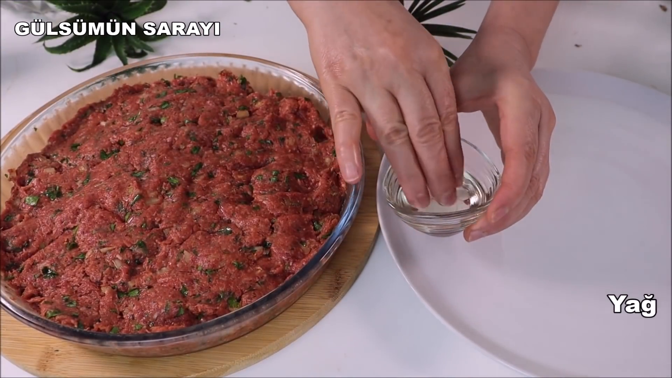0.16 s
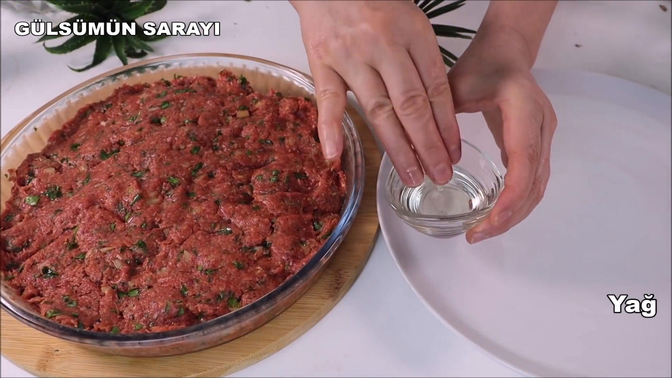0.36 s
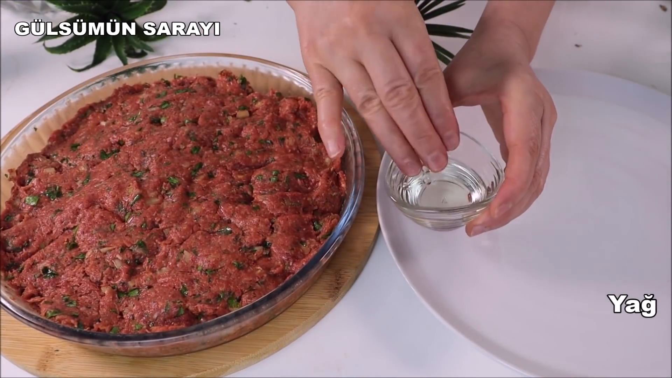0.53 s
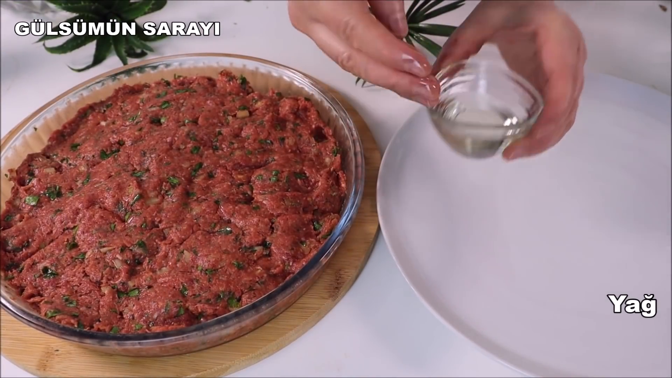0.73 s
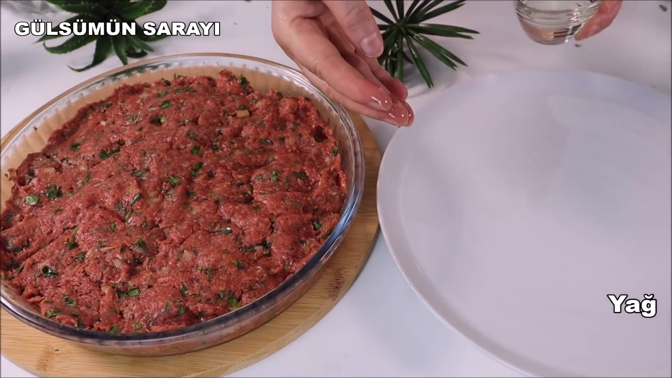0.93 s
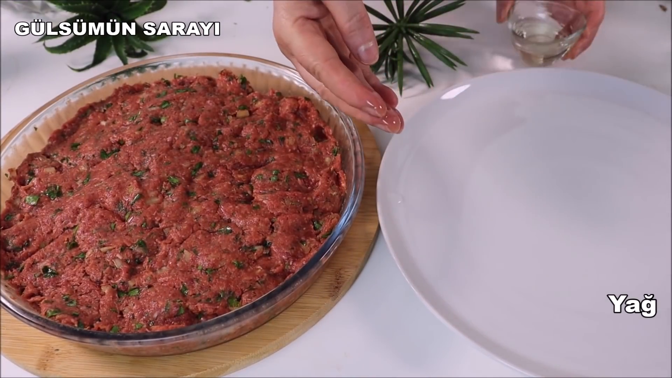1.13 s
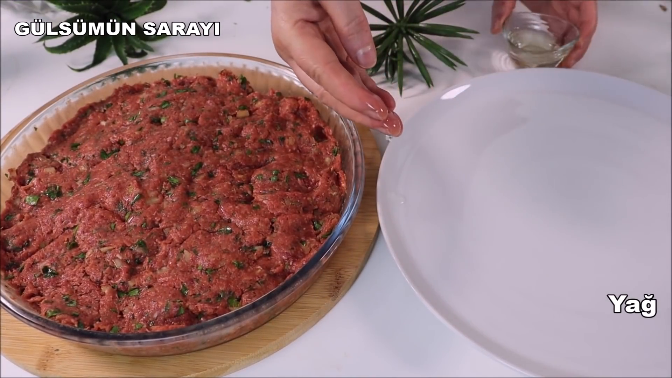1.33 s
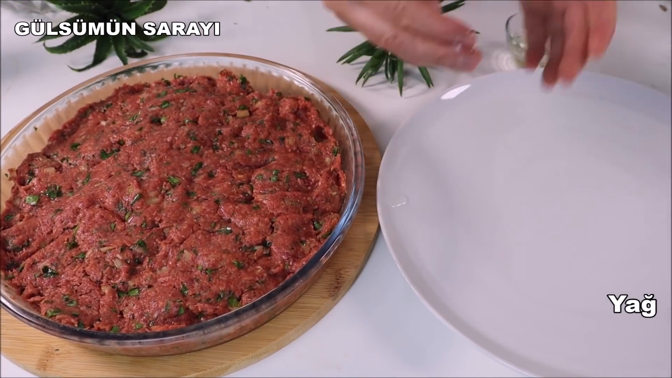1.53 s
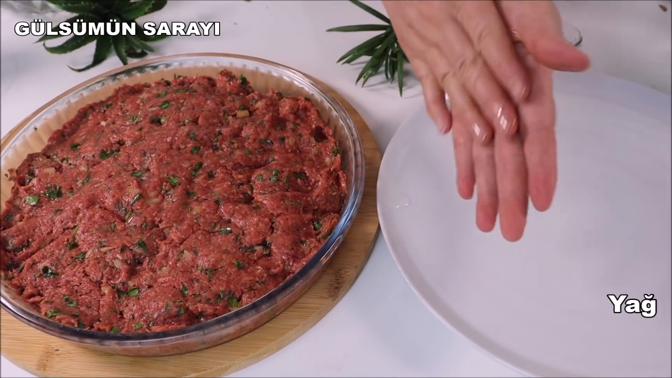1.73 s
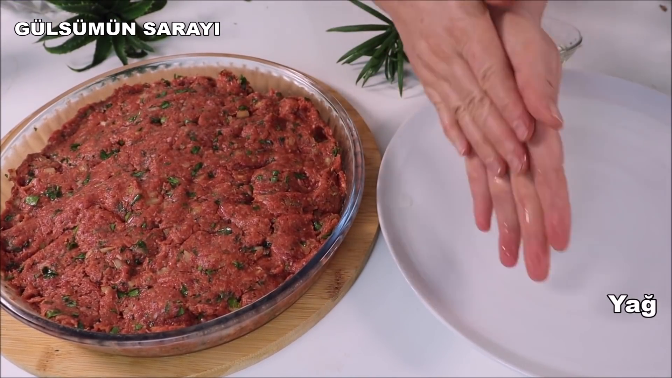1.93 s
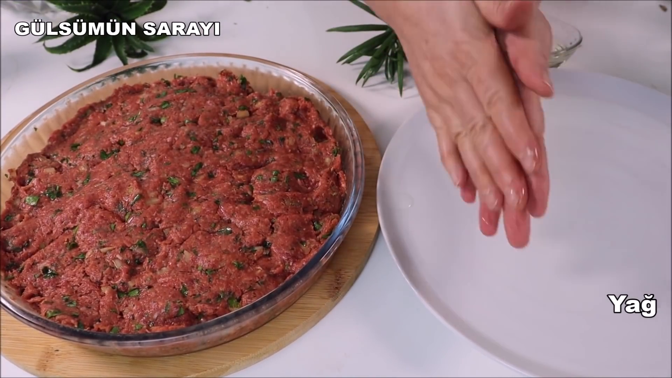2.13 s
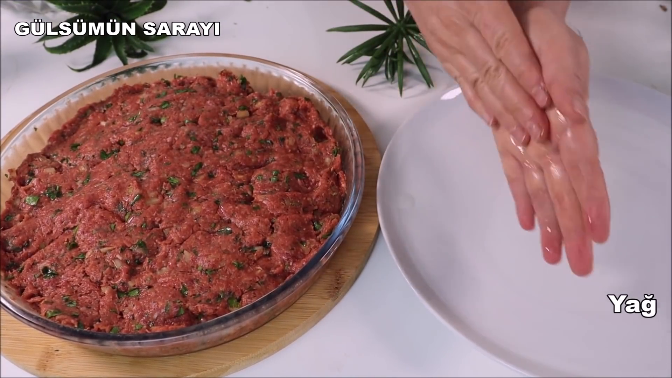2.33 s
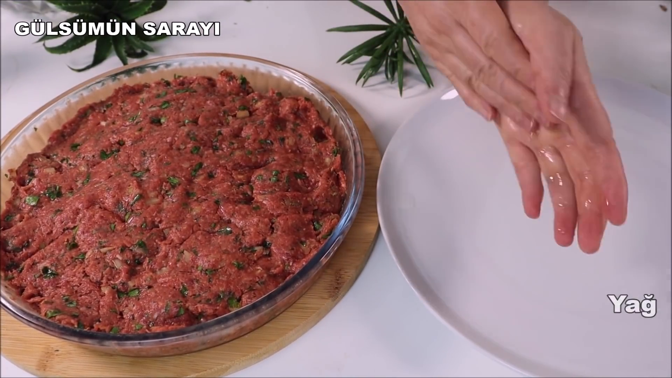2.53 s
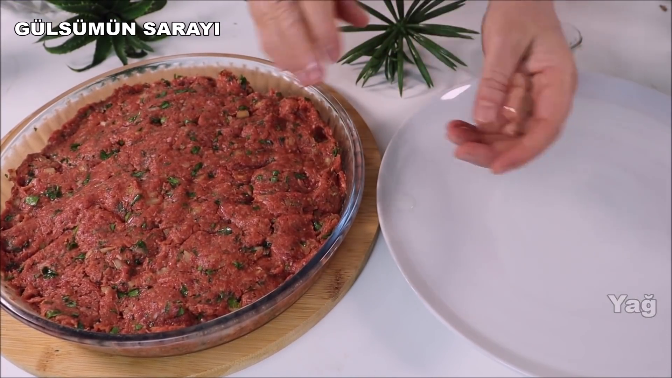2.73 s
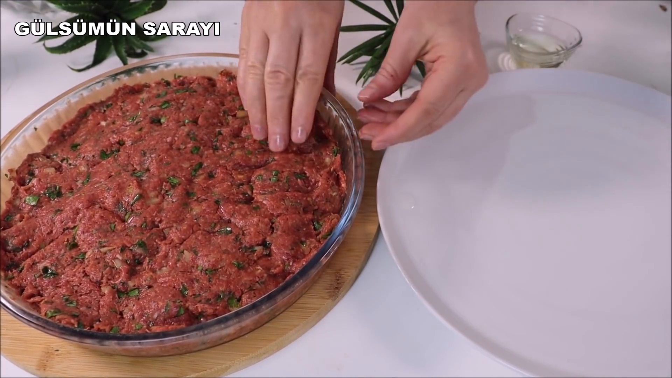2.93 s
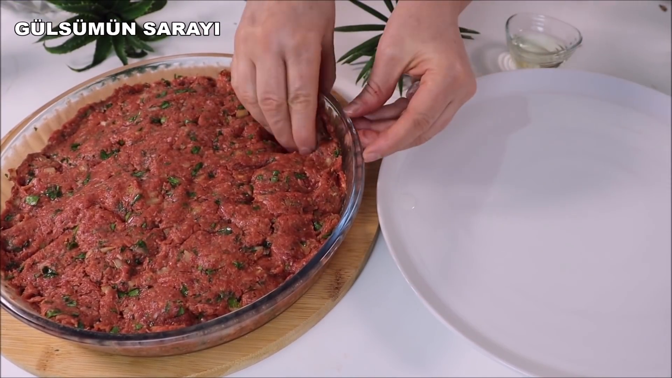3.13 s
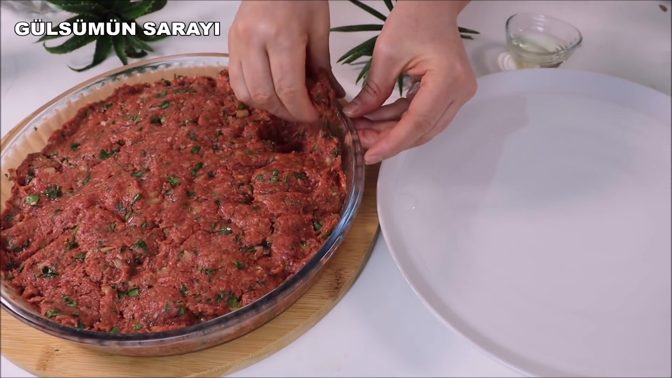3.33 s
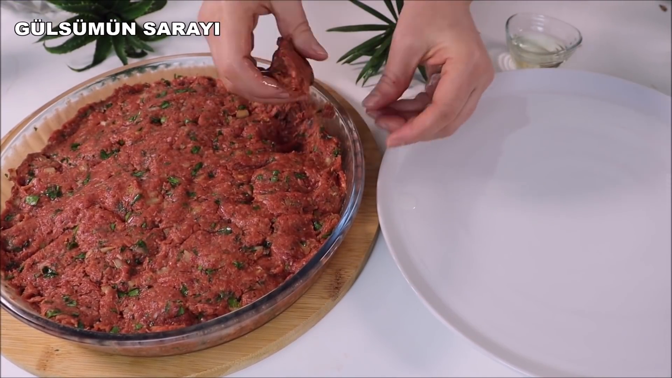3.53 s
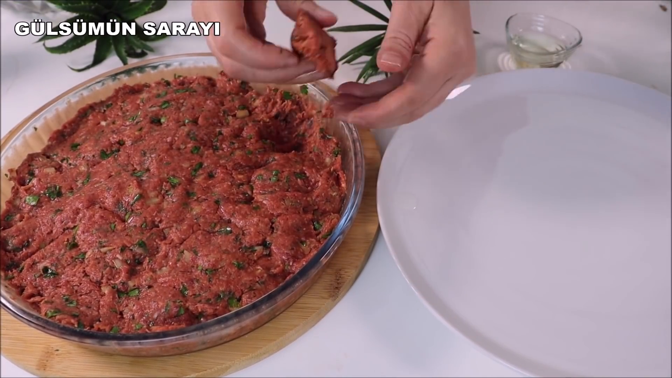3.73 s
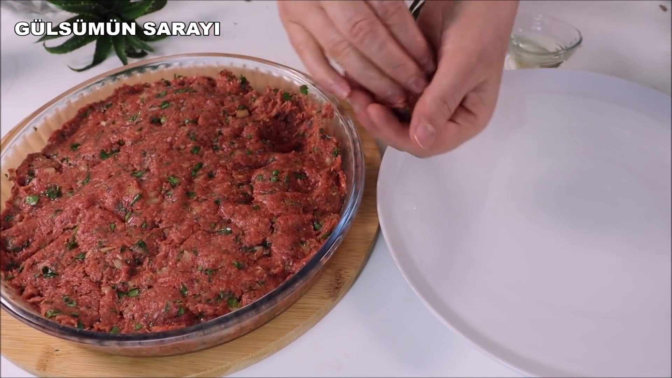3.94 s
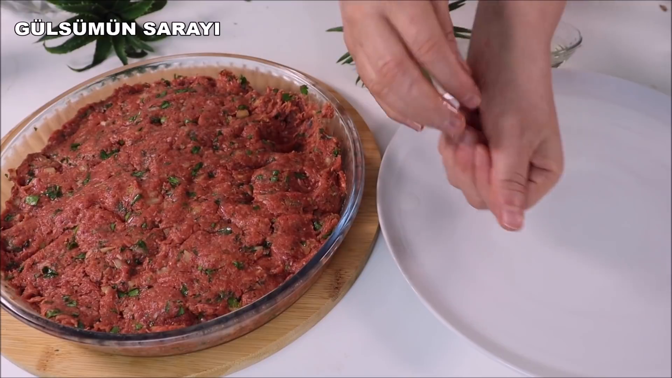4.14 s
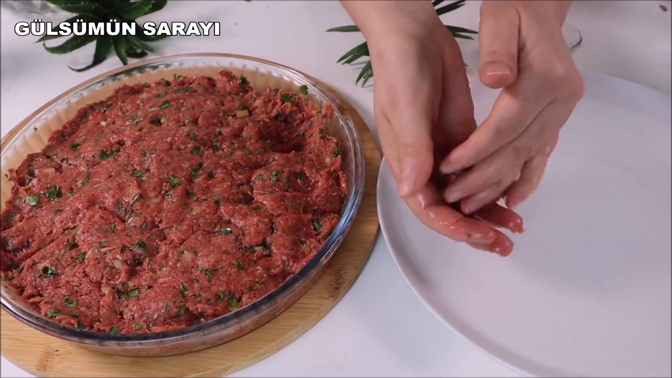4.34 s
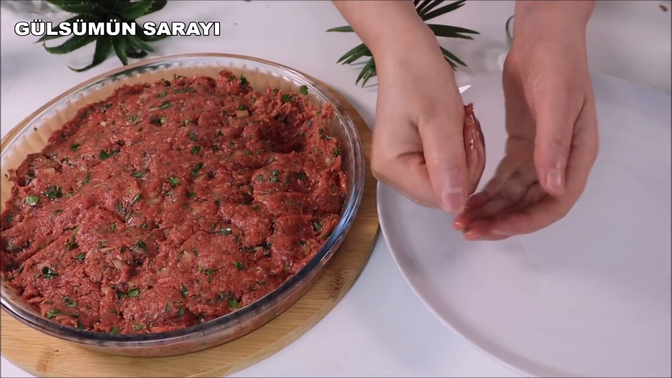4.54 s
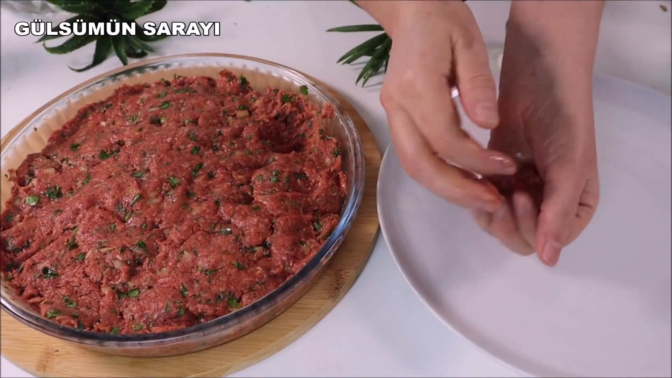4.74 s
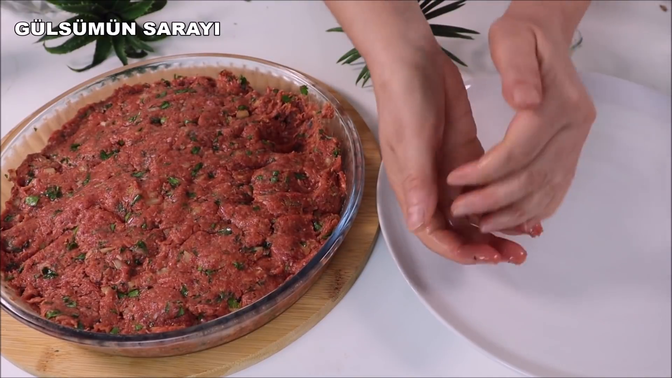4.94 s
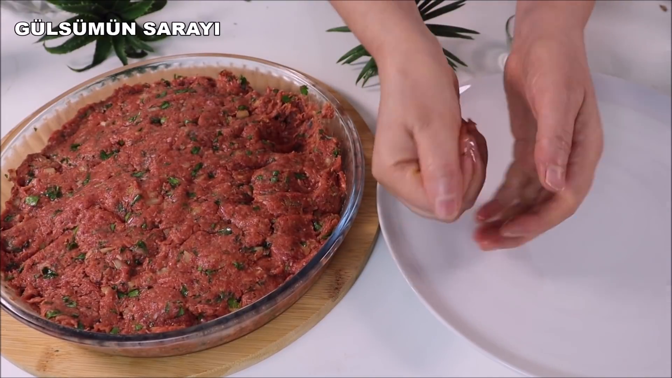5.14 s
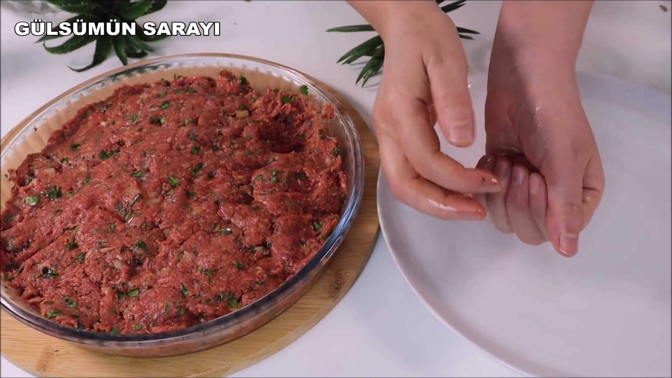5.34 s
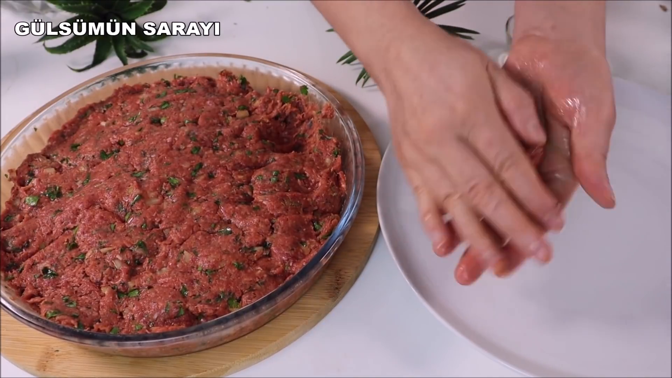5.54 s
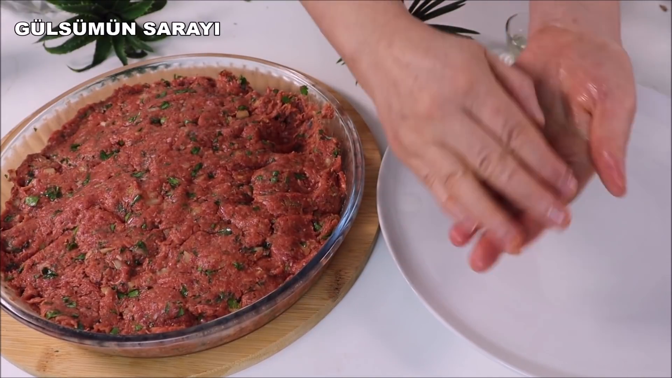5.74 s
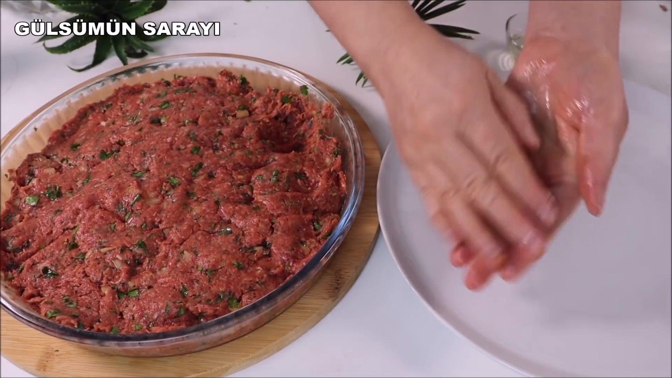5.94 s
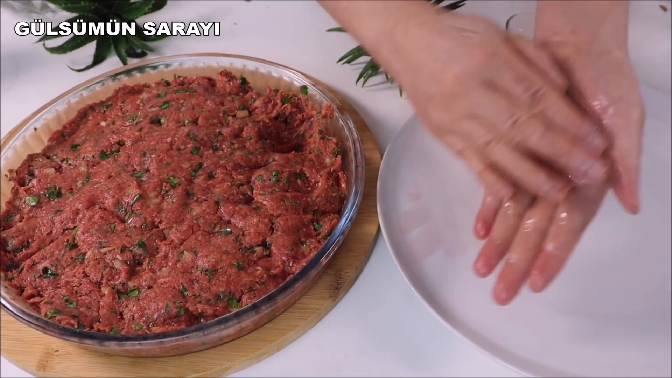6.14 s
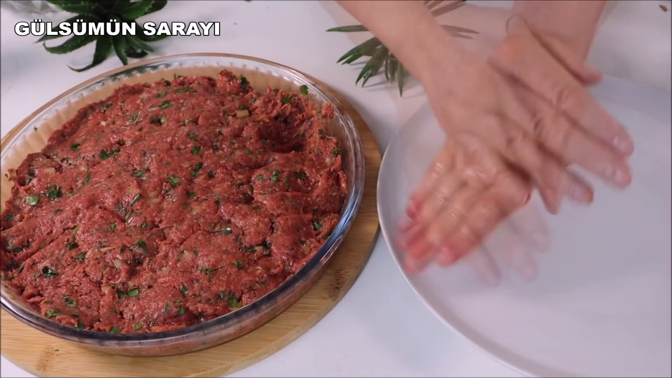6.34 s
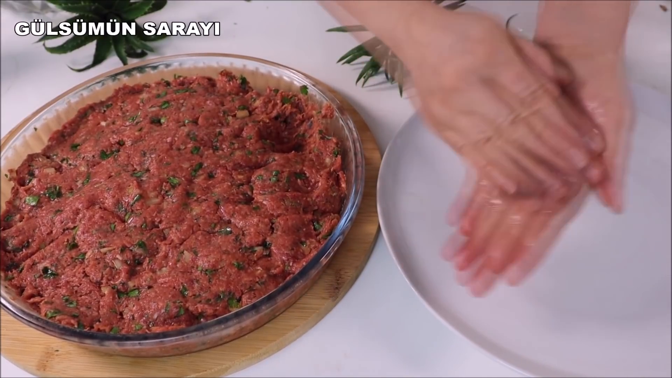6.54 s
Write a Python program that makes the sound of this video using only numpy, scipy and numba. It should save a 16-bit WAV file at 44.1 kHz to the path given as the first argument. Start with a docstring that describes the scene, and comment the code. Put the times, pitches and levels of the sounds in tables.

```python
"""Hands rub softly, then a small glass bowl meets a kitchen counter: a light touch, a knock with bounces.
The rubbing grows, fingers touch a glass dish and pinch sticky mince, and cupped palms roll it at the end.
A fan hum, a wavering hum, deep rumble and room noise last throughout; reflections add a small hard room.
Solids sound as clicks exciting damped modes, skin as friction noise with sticky ticks,
and the air between the palms as a gliding resonance."""
import sys
import numpy as np
from scipy import signal
from scipy.fft import rfft, irfft, next_fast_len
from scipy.io import wavfile
from scipy.ndimage import uniform_filter1d
from numba import njit

SR = 44100
rng = np.random.default_rng(int(sys.argv[2]) if len(sys.argv) > 2 else 0)


def digitize_waveform(pressure):
    """Quantize a signal to 16-bit integers and store it at the path in sys.argv[1].

    Rows of a 2-D input are taken as channels; values are limited to [-1, 1].
    """
    field = np.atleast_2d(pressure).T
    bounded = np.clip(field, -1, 1)
    quanta = np.round(bounded * 32767).astype(np.int16)
    wavfile.write(sys.argv[1], SR, quanta)


N = 290178


def amp(db):
    """Level: amplitude ratio from decibels."""
    return 10 ** (np.asarray(db) / 20)


def rms_one(x):
    """Normalisation: scale to an rms of 1."""
    return x / np.sqrt(np.mean(x ** 2) + 1e-20)


def in_time(rows):
    """Linear interpolation: each column of a curve table, one value per sample."""
    seconds, *columns = np.transpose(rows)
    return [np.interp(np.arange(N) / SR, seconds, column) for column in columns]


def at_hz(points, hz):
    """Interpolation of a table along a logarithmic frequency axis."""
    table_hz, values = np.array(points).T
    return np.interp(np.log(hz + 1), np.log(table_hz), values)


def drift(rate_hz):
    """Low-pass random process: slow wandering with rms 1, computed at every 40th sample."""
    step = 40
    r = np.exp(-2 * np.pi * rate_hz * step / SR)
    white = rng.standard_normal(N // step + 2002)
    slow = signal.lfilter([1], [1, -2 * r, r * r], white)[2000:]  # drop the settling
    return np.interp(np.arange(N) / step, np.arange(len(slow)), rms_one(slow))


def ring(clicks, hz, t60):
    """Damped mode: a unit click starts a decaying sine of height 1."""
    r = amp(-60 / (t60 * SR))
    w = 2 * np.pi * hz / SR
    return signal.lfilter([0, np.sin(w)], [1, -2 * r * np.cos(w), r * r], clicks + 1e-18)


def ring_modes(clicks, modes):
    """Modal superposition: damped modes summed with alternating sign."""
    return sum(amp(db) * ring(clicks, hz, t60) * (-1) ** k for k, (hz, db, t60) in enumerate(modes))


def colour(x, spectrum):
    """Spectral shaping: weight each frequency by a table, then scale to rms 1."""
    size = next_fast_len(N)
    gain = amp(at_hz(spectrum, np.fft.rfftfreq(size, 1 / SR)))
    return rms_one(irfft(rfft(x, size) * gain, size)[..., :N])


def stereo_noise(size, likeness):
    """Partial coherence: mixing mid and side noise sets the left-right likeness by frequency."""
    mid, side = rfft(rng.standard_normal((2, size)))
    alike = np.clip(at_hz(likeness, np.fft.rfftfreq(size, 1 / SR)), -1, 1)
    common = np.sqrt((1 + alike) / 2) * mid
    opposed = np.sqrt((1 - alike) / 2) * side * [[1], [-1]]
    return irfft(common + opposed, size)


@njit
def moving_resonance(x, hz, width_hz, sr):
    """Resonance: a two-pole filter whose centre frequency glides."""
    out = np.zeros(len(x))
    r = np.exp(-np.pi * width_hz / sr)
    for i in range(2, len(x)):
        feedback = 2 * r * np.cos(2 * np.pi * hz[i] / sr) * out[i - 1] - r * r * out[i - 2]
        out[i] = x[i] - x[i - 2] + feedback
    return out


def sharp_pulse(spectrum, size=4096):
    """Minimum phase: the most compact causal pulse with this spectrum, scaled to peak 1."""
    log_gain = np.log(amp(at_hz(spectrum, np.fft.rfftfreq(size, 1 / SR))))
    cepstrum = irfft(log_gain, size)
    # folding the cepstrum forward in time makes the pulse causal
    cepstrum[1:size // 2] *= 2
    cepstrum[size // 2 + 1:] = 0
    pulse = irfft(np.exp(rfft(cepstrum)), size)
    return pulse / np.abs(pulse).max()


FAN_HZ = 74.1
# Fan harmonics. Each row: multiple of FAN_HZ, typical rms level in dB.
FAN_HARMONICS = [(1, -62.5), (2, -68.5), (3, -69.5), (4, -89), (6, -89), (7, -71.5), (8, -72.5), (16, -88)]


def fan():
    """Harmonic series: sines at multiples of one unsteady frequency, each wavering in level."""
    turn = 2 * np.pi * np.cumsum(FAN_HZ * (1 + 0.001765 * drift(1.0))) / SR
    total = np.zeros(N)
    for k, db in FAN_HARMONICS:
        level = amp(db + 1.17 * min(k, 3) * drift(5.7))
        total += level * np.sqrt(2) * np.sin(k * turn + rng.uniform(0, 2 * np.pi))
    return total


# Course of a wavering hum. Each row: time in seconds, level in dB, centre in Hz.
HUM_COURSE = [(0, -61.5, 222), (.3, -72, 223), (1.0, -66.5, 216), (1.35, -62, 211), (1.75, -54.5, 212),
              (2.0, -52.5, 203), (2.25, -58, 212), (2.45, -67.5, 215), (3.05, -63, 220), (3.3, -56.5, 231),
              (3.45, -64, 217), (4.4, -64, 215), (5.2, -69, 215), (5.37, -57, 204), (5.6, -66, 212),
              (5.9, -68.5, 216), (6.17, -51.5, 228.4), (6.58, -61, 210)]
HUM_WIDTH_HZ = 14.0


def hum():
    """Narrow-band noise: a sharp resonance of wandering pitch, driven by white noise."""
    level_db, hz = in_time(HUM_COURSE)
    return amp(level_db) * rms_one(moving_resonance(rng.standard_normal(N), hz, HUM_WIDTH_HZ, SR))


# Course of the deep rumble. Each row: time in seconds, level in dB.
RUMBLE_LEVEL = [(0, -72), (.3, -64), (1.3, -74), (1.67, -53.5), (1.9, -59), (2.4, -82), (4.1, -75),
                (4.84, -61.5), (5.25, -72), (5.7, -79), (5.95, -58), (6.2, -54.5), (6.58, -62)]


def rumble():
    """Band-limited noise: random low-frequency pressure with a drifting level."""
    band = signal.butter(1, [38, 75], "band", fs=SR, output="sos")
    deep = signal.sosfilt(band, rng.standard_normal(N))
    return amp(in_time(RUMBLE_LEVEL)[0]) * rms_one(deep)


# Spectrum of room and microphone noise. Each row: frequency in Hz, relative density in dB per Hz.
AIR_SPECTRUM = [(20, -13), (45, -7.5), (100, -13.5), (200, -12), (330, -7), (450, -11.5), (700, -14),
                (1700, -17.5), (3200, -21.5), (6000, -23.5), (16000, -26)]
# Course of that noise. Each row: time in seconds, level in dB before the common AIR_GAIN_DB.
AIR_COURSE = [(0, -58.5), (1.0, -59), (1.2, -57), (1.8, -58), (2.9, -58), (3.4, -57), (4.0, -58),
              (5.15, -59), (5.5, -56.5), (5.95, -58), (6.2, -54.5), (6.58, -54)]
# Its stereo coherence. Each row: frequency in Hz, left-right likeness from -1 to 1.
AIR_COHERENCE = [(60, 0.85), (150, 0.36), (380, 0.74), (950, 0.25), (2380, 0.24), (5980, -0.32),
                 (15000, -0.31)]
AIR_GAIN_DB = 3.5


def room_noise():
    """Diffuse noise: broadband, partly coherent between left and right, slowly changing in level."""
    air = colour(stereo_noise(N, AIR_COHERENCE), AIR_SPECTRUM)
    return air * amp(in_time(AIR_COURSE)[0] + AIR_GAIN_DB)


def background():
    """Superposition of the independent background sources."""
    return fan() + hum() + rumble() + room_noise()


# Reverberation by band. Each row: frequency in Hz, decay time t60 in seconds.
ROOM_DECAY = [(150, 0.43), (500, 0.25), (1500, 0.36), (3000, 0.26), (8000, 0.39)]
# Stereo coherence of the reflections. Each row: frequency in Hz, left-right likeness.
ROOM_COHERENCE = [(100, 1), (700, 0.99), (1500, 0.94), (3000, 0.76), (7000, 0.32), (15000, .1)]


def room(x, build_s=0.0016, early_db=5.5, early_s=0.015):
    """Reverberation: dense reflections die band by band, with an early boost from the nearest surfaces."""
    size = SR // 2
    t = np.arange(size) / SR
    noise = stereo_noise(size, ROOM_COHERENCE)
    lowpassed = [np.zeros_like(noise)]
    for hz in 125 * 2. ** np.arange(8):
        lowpassed.append(signal.sosfiltfilt(signal.butter(2, hz, fs=SR, output="sos"), noise))
    tail = 0
    for k in range(8):
        band = lowpassed[k + 1] - lowpassed[k]
        tail = tail + band * amp(-60 * t / at_hz(ROOM_DECAY, 88 * 2. ** k))
    tail = tail * (1 - np.exp(-t / build_s)) * amp(early_db * np.exp(-t / early_s))
    tail = tail / np.sqrt(np.sum(tail ** 2) / 2)  # unit mean energy per channel
    return signal.fftconvolve(x[None], tail, axes=1)[:, :N]


# Strokes of skin on skin. Each row: peak in seconds, peak level in dB, rise in seconds, fall in seconds,
# treble share in dB. Rise and fall each span SWELL_DB.
STROKES_OF_SKIN = [(1.111, -50.5, 0.14, 0.27, -2), (1.34, -50, 0.013, 0.022, -5),
                   (1.83, -48.5, 0.023, 0.12, 3), (1.902, -40.5, 0.067, 0.047, -1.5),
                   (2.02, -43, 0.08, 0.11, -1), (2.114, -52.5, 0.12, 0.021, -0.5),
                   (2.228, -48, 0.059, 0.08, 0), (2.268, -46, 0.11, 0.029, -2.5),
                   (2.352, -40.5, 0.04, 0.071, -1.5), (2.512, -43.5, 0.043, 0.041, -0.5),
                   (2.586, -44.5, 0.037, 0.09, -1), (2.67, -59.5, .05, 0.098, -1.5),
                   (3.132, -54, .017, 0.04, -10), (3.276, -52.5, 0.14, .2, -1),
                   (3.34, -49, .08, 0.19, -0.5), (3.446, -52.5, 0.22, 0.074, -1),
                   (3.526, -53.5, 0.12, 0.027, 1), (3.626, -59, .02, .1, -0.5),
                   (3.904, -63.5, .016, .3, -1), (4.128, -53, 0.021, 0.025, -0.5),
                   (4.21, -58, .1, .08, -0.5), (4.272, -61, .1, 0.064, -11), (4.348, -48, 0.02, 0.085, 1),
                   (4.392, -49.5, 0.079, 0.037, -1.5), (4.634, -57.5, 0.17, 0.042, -8),
                   (4.706, -42.5, 0.024, 0.058, -0.5), (4.94, -59.5, 0.17, 0.041, -9),
                   (5.016, -48.5, 0.05, 0.04, -1.5), (5.224, -55, 0.078, .036, -11),
                   (5.267, -47, 0.016, 0.063, -2), (5.462, -62, 0.071, 0.21, -3.5),
                   (5.554, -49, 0.035, 0.035, -1.5), (5.674, -49.5, .012, 0.11, 3),
                   (6.3, -51, 0.011, 0.035, -3)]
# Unbroken light contact, swelling when the mince is rolled. Each row: time in seconds, hiss level in dB.
LIGHT_CONTACT = [(0, -70), (1.4, -67), (3.0, -73), (4.0, -71.5), (5.55, -71), (5.75, -57), (5.93, -58.5),
                 (6.05, -55), (6.12, -54.5), (6.5, -54), (6.58, -61)]
SWELL_DB, CONTACT_TREBLE_DB = 20, -1


def touch():
    """Energy addition: strokes, even in dB, join the light contact; returns hiss level and treble share in dB."""
    t = np.arange(N) / SR
    power = amp(in_time(LIGHT_CONTACT)[0]) ** 2
    treble = power * CONTACT_TREBLE_DB  # treble share weighted by power
    for s, peak_db, rise, fall, treble_db in STROKES_OF_SKIN:
        near = slice(max(round((s - 2 * rise) * SR), 0), round((s + 2 * fall) * SR))
        away = np.where(t[near] < s, (s - t[near]) / rise, (t[near] - s) / fall)
        stroke = amp(peak_db - SWELL_DB * away) ** 2
        power[near] += stroke
        treble[near] += stroke * treble_db
    return 10 * np.log10(power), treble / power


# Spectrum of skin friction before its bands are rebalanced. Each row: frequency in Hz, density in dB per Hz.
SKIN_SPECTRUM = [(900, -21), (2000, 0.5), (4000, -2.5), (7000, -2.5), (10000, -0.5), (16000, -0.5)]
# Stereo coherence of the friction hiss. Each row: frequency in Hz, left-right likeness.
SKIN_COHERENCE = [(1500, 0.71), (4000, 0.48), (9000, 0.45), (15000, 0.41)]
# How much the skin clings. Each row: time in seconds, mean ticks per second.
STICKINESS = [(0, 100), (3.0, 19), (3.2, 320), (3.7, 420), (4.0, 230), (5.6, 200), (5.8, 260), (6.58, 126)]
# dull share at a middling touch; it shrinks by DULL_LOSS of each dB above
DULL_DB, DULL_AT_DB, DULL_LOSS = -9.5, -55, 0.65


def skin():
    """Stick-slip friction: fluctuating hiss with random ticks; its treble and dull parts follow the touch."""
    hiss_db, treble_db = touch()
    dull_db = DULL_DB - DULL_LOSS * np.maximum(hiss_db - DULL_AT_DB, -8.0)
    per_s, = in_time(STICKINESS)
    happens = rng.random(N) < np.maximum(per_s, 0) / SR
    ticks = happens * amp(3.85 * np.minimum(rng.exponential(1, N), 4))
    hiss = stereo_noise(N, SKIN_COHERENCE) * amp(1.66 * drift(60))
    friction = colour(hiss + 3.0 * ticks * rng.choice([-1, 1], N), SKIN_SPECTRUM)
    dull, below_treble = [signal.sosfiltfilt(signal.butter(2, hz, fs=SR, output="sos"), friction)
                          for hz in (4800, 10000)]
    middle, treble = below_treble - dull, friction - below_treble
    share = np.clip(amp(treble_db), 0, .97)
    # treble and middle trade off by power; the dull part is added
    parts = share * rms_one(treble) + np.sqrt(1 - share ** 2) * rms_one(middle) + amp(dull_db) * rms_one(dull)
    return amp(hiss_db) * parts


# Air hollow between palms or fingers, gliding as it opens or closes. Each row: start in seconds,
# end in seconds, start in Hz, end in Hz, rms level in dB before the swell and fade.
AIR_HOLLOWS = [(1.822, 1.845, 4800, 3650, -56.5), (1.829, 1.878, 3380, 2400, -52.5),
               (1.879, 1.958, 2380, 2020, -60), (2.06, 2.1, 2700, 4600, -59),
               (2.186, 2.228, 4700, 2360, -56.5), (2.228, 2.292, 2500, 1570, -64),
               (2.336, 2.407, 1780, 3070, -56.5), (2.348, 2.392, 5430, 5600, -51.5),
               (2.5, 2.522, 2300, 2100, -58.5), (3.33, 3.404, 3680, 3420, -54.5),
               (3.398, 3.48, 3130, 3160, -55.5), (4.241, 4.3, 5260, 6440, -56.5),
               (4.69, 4.748, 5440, 4800, -55), (4.919, 4.945, 4400, 4400, -61),
               (5.256, 5.29, 2900, 2680, -57.5), (5.44, 5.483, 6000, 5600, -61),
               (5.67, 5.73, 2850, 4500, -58.5), (5.80, 5.84, 3800, 5000, -60),
               (6.183, 6.243, 2200, 2200, -59), (6.501, 6.543, 5000, 5200, -61),
               (5.715, 5.788, 3000, 2560, -60), (5.777, 5.852, 2800, 3380, -58),
               (5.853, 5.886, 4300, 3530, -59), (5.938, 6.002, 2680, 2250, -57),
               (5.963, 6.018, 4170, 5200, -58), (6.089, 6.17, 3000, 2300, -55),
               (6.145, 6.19, 2410, 3860, -54.5), (6.285, 6.332, 2420, 2520, -52.5),
               (6.317, 6.355, 4180, 4300, -54.5), (6.409, 6.55, 3160, 2600, -53)]
HOLLOW_WIDTH_HZ = 300.0


def hollows():
    """Cavity resonance: friction noise excites the trapped air, gliding in pitch as it swells and fades."""
    out = np.zeros(N)
    for start, end, start_hz, end_hz, db in AIR_HOLLOWS:
        at, size = round(start * SR), round((end - start) * SR)
        glide = np.geomspace(start_hz, end_hz, size)
        slips, unevenness = rng.standard_normal((2, SR // 4))[:, :size]
        # wet skin slips unevenly: the drive comes in lumps
        drive = slips * amp(25 * uniform_filter1d(unevenness, size=100))
        air = moving_resonance(drive, glide, HOLLOW_WIDTH_HZ, SR)
        out[at:at + size] += amp(db) * rms_one(air) * np.sin(np.linspace(0, np.pi, size))
    return out


# Sticky mince and wet skin letting go. Each row: time in seconds, starting height in dB, pitch in Hz.
RELEASES = [(2.672, -39, 9340), (3.1976, -41, 13000), (3.257, -42, 10100), (3.2704, -37, 13600),
            (3.299, -37, 4780), (3.3104, -41, 12800), (3.3433, -31, 13800), (3.3608, -39, 3350),
            (3.3764, -42, 3660), (3.426, -37, 3260), (3.6278, -33, 10000), (3.636, -38, 9850),
            (3.6603, -36, 12200), (4.174, -42, 11500), (4.2308, -32, 12700), (4.3321, -40, 13400),
            (4.3942, -32.5, 7240), (4.569, -47, 8150), (4.6954, -37, 13600), (4.7032, -36, 6800),
            (4.7144, -35, 5370), (4.9276, -37, 5970), (4.9886, -37, 13700), (5.011, -27, 13700),
            (5.0144, -37, 13600), (5.155, -40, 14800), (5.218, -35, 6660), (5.254, -32.5, 6850),
            (5.2639, -30, 14000), (5.4545, -40, 6240), (5.495, -42, 10500), (5.5398, -39, 11800),
            (5.6742, -38.5, 3420), (6.2552, -32, 13500), (6.2994, -34, 2750)]
SMACK_T60_S = 0.0028


def smacks():
    """Impulse response: each sudden release is one click ringing for a few ms at its own pitch."""
    out = np.zeros(N)
    for s, peak_db, hz in RELEASES:
        at = round(s * SR)
        pop = amp(peak_db) * ring(signal.unit_impulse(2000), hz, SMACK_T60_S)
        out[at:][:2000] += pop[:N - at]
    return out


# Fingertips touch the glass dish. Each row: time in seconds, click height in dB.
DISH_TOUCHES = [(3.1265, -43.5), (3.1325, -45), (3.1435, -45), (3.158, -50)]
# Modes of the dish. Each row: frequency in Hz, level in dB relative to the click, t60 in seconds.
DISH_MODES = [(697, -8, 0.052), (2057, 1.5, 0.034), (3100, 3.5, 0.0072), (3900, 0, .005), (9600, -14, .004)]


def dish():
    """Modal response: light taps ring the dish's few damped modes."""
    clicks = np.zeros(N)
    for s, peak_db in DISH_TOUCHES:
        clicks[round(s * SR)] = amp(peak_db)
    return sum(amp(db) * ring(clicks, hz, t60) for hz, db, t60 in DISH_MODES)


# Bowl meets counter. Each row: time in seconds, click level in dB before softening,
# contact low-pass in Hz, extra drive of the ringing in dB.
CONTACTS = [(1.3732, -14.5, 3400, 0.5), (1.4797, -12, 4000, -26), (1.4827, -2.5, 8050, -1),
            (1.4868, -9.5, 1200, 4.5), (1.4899, -21, 8000, -8), (1.4932, -3, 5030, 0.5),
            (1.4982, -15.5, 5000, 6.5), (1.5047, -15.5, 5000, -11), (1.507, -10, 2000, 0),
            (1.5173, -9, 3980, -0.5)]
# Near sound of a contact. Each row: frequency in Hz, level in dB relative to the click, t60 in seconds.
NEAR_MODES = [(1020, -3, 0.0049), (2390, 2, 0.0043), (2950, -8.5, 0.01), (3705, -11.5, 0.022),
              (8620, -27.5, 0.023)]
# Thud of a contact. Each row: frequency in Hz, relative density in dB per Hz.
THUD_SPECTRUM = [(60, -49), (200, -20), (370, -11.5), (470, 3.5), (800, 4.5), (1300, -2.5), (1800, -6.5),
                 (2500, -3.5), (3100, -5), (3800, -8), (4800, -16), (6500, -22.5), (8700, -23.5),
                 (16000, -24.5)]
# Narrow ringing modes of glass and counter. Each row: frequency in Hz, level in dB relative to
# the click, t60 in seconds.
GLASS_MODES = [(210, -36, .17), (269, -35, .2), (483, -30, .25), (533, -28, .33), (646, -30, .12),
               (783, -28, .28), (833, -28, .25), (1120, -27, .17), (1362, -30, .2), (1437, -29, .12),
               (1523, -27, .19), (1700, -35, .27), (1814, -34, .22), (2315, -31, .17), (2358, -31, .19),
               (2482, -30, .18), (2611, -31, .18), (3625, -32, .18), (3811, -33, .13), (4097, -40, .19),
               (4465, -40, .2), (4486, -32, .25)]


def bowl():
    """Impact excitation: clicks, duller when soft, give a short knock, a spread thud and ringing modes."""
    clicks = np.zeros((2, N))  # one row drives knock and thud, the other the ringing
    for s, peak_db, soft_hz, ring_db in CONTACTS:
        soften = signal.butter(1, soft_hz, fs=SR, output="sos")
        pulse = signal.sosfilt(soften, signal.unit_impulse(200))
        clicks[:, round(s * SR):][:, :200] += amp([[peak_db], [peak_db + ring_db]]) * pulse
    knock = ring_modes(clicks[0], NEAR_MODES)
    thud = signal.fftconvolve(clicks[0], sharp_pulse(THUD_SPECTRUM))[:N]
    rings = ring_modes(clicks[1], GLASS_MODES)
    # high-pass: weakens the bass of knock, thud and ringing below about 130 Hz
    return signal.sosfilt(signal.butter(2, 130, "high", fs=SR, output="sos"), [knock, thud, rings])


def scene():
    """Superposition: direct sound of the near sources, their reflections and the background."""
    knock, thud, rings = bowl()
    rub = skin()
    small = hollows() + smacks() + dish()
    wet = room(thud * amp(2.0) + rings * amp(-7.5) + (rub[0] + small) * amp(-9.0))
    direct = knock + thud * amp(-6.0) + rings + rub + small
    return direct + wet + background()


CUTOFF_HZ = 15830


def record(dry):
    """Band limiting: the microphone loses the deepest bass, and the top is cut steeply."""
    dry = signal.sosfilt(signal.butter(3, 38, "high", fs=SR, output="sos"), dry)
    return signal.sosfilt(signal.ellip(14, .5, 75, CUTOFF_HZ, fs=SR, output="sos"), dry)


dry = scene()
out = record(dry)
digitize_waveform(out)
```